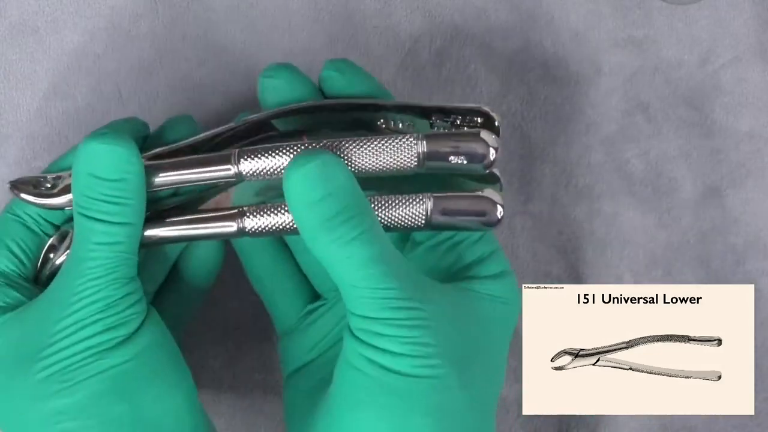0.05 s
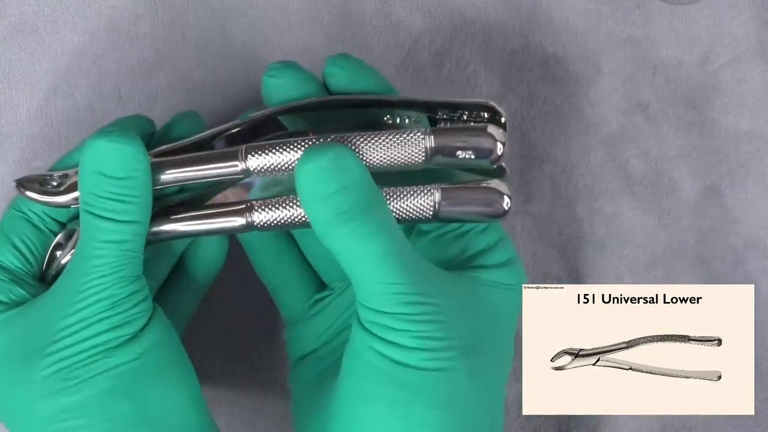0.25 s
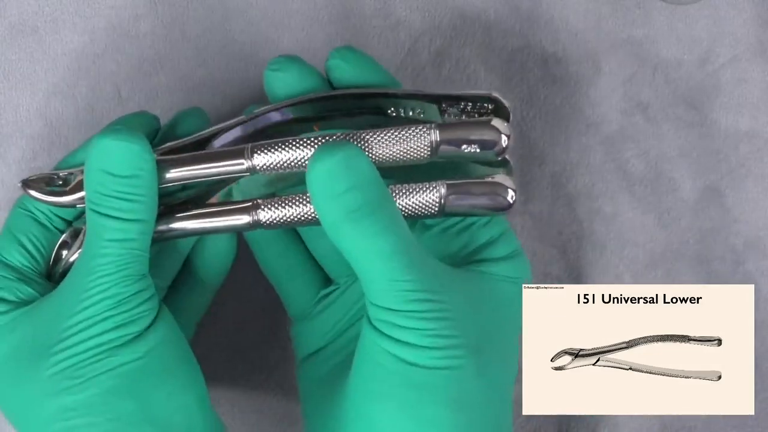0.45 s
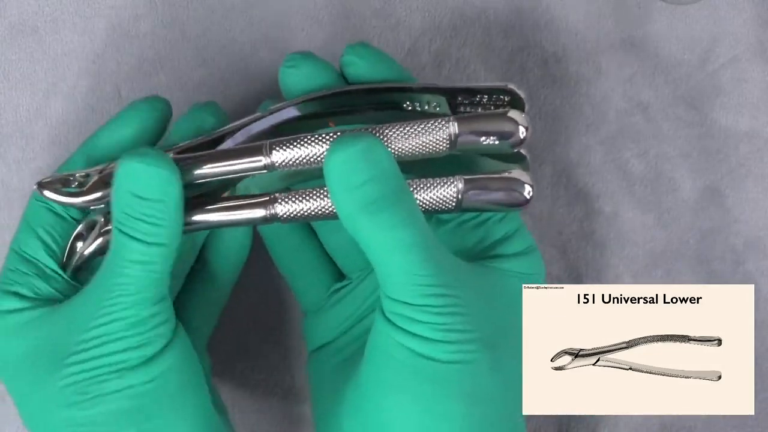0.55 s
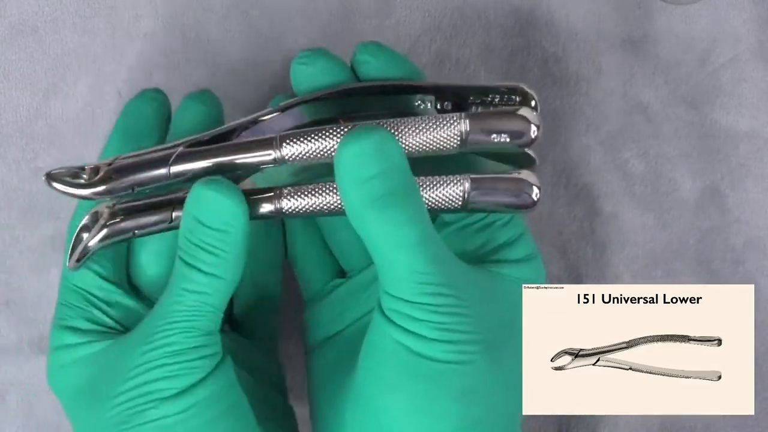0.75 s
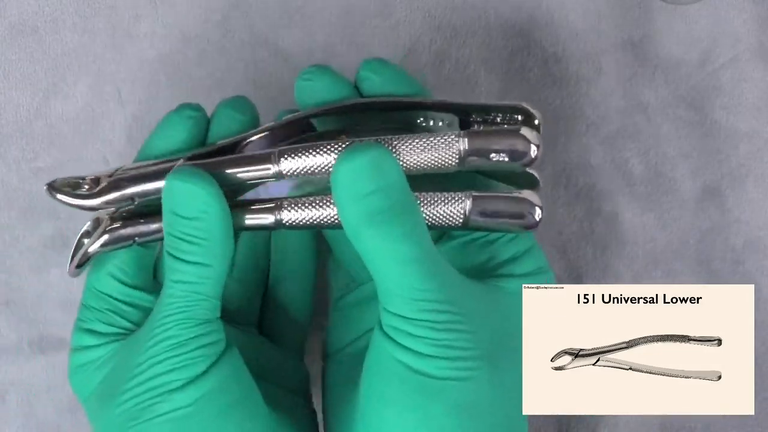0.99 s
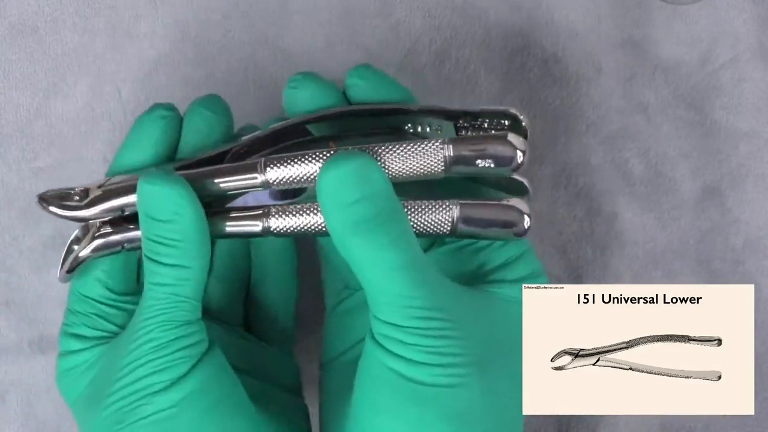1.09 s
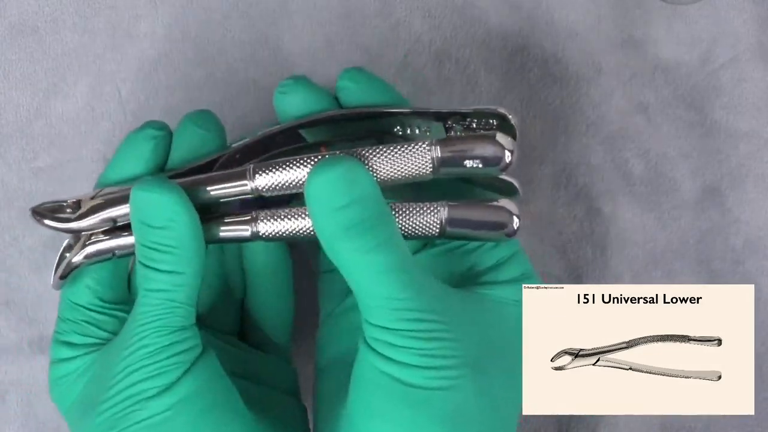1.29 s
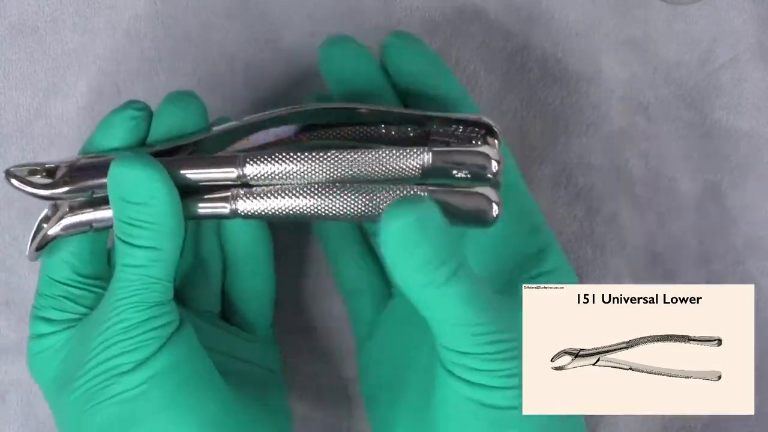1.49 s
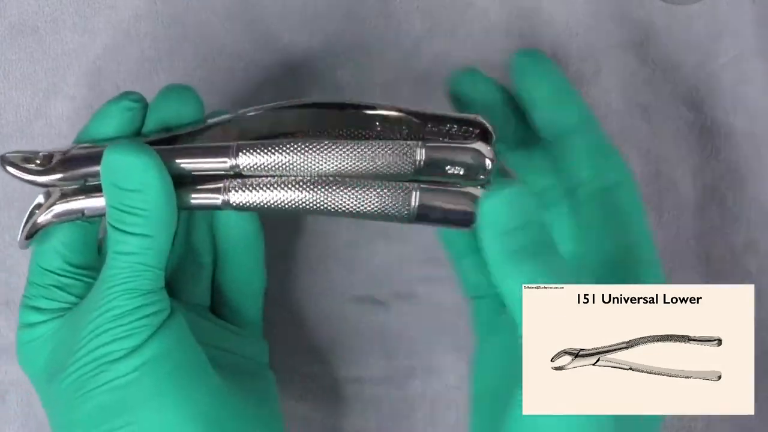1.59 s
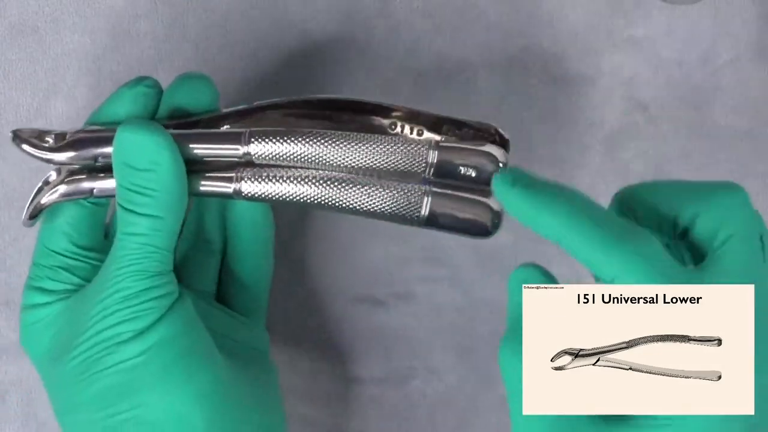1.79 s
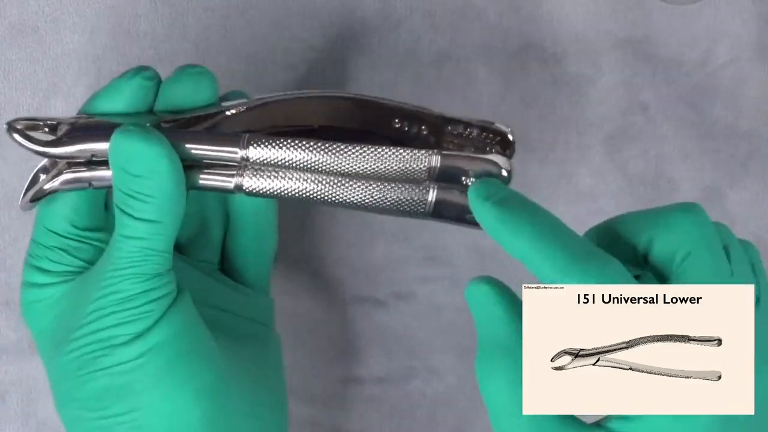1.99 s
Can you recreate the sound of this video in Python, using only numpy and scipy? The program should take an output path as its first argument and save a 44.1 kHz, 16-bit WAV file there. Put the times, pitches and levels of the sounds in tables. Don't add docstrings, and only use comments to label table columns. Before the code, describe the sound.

Metal hand tools clack together and bounce, then tick and ring softly over quiet room rumble

```python
import sys
import numpy as np
from scipy import signal
from scipy.fft import rfft, irfft
from scipy.io import wavfile

SR = 44100
rng = np.random.default_rng(int(sys.argv[2]) if len(sys.argv) > 2 else 0)


def unload_audio(sound):
    columns = np.transpose(np.atleast_2d(sound))
    steps = np.round(np.clip(columns, -1, 1) * 32767)
    wavfile.write(sys.argv[1], SR, steps.astype(np.int16))


def volts_from_db(level):
    exponent = np.asarray(level, float) / 20
    return 10 ** exponent


N = 90228
t = np.arange(N) / SR


def rms_one(x):
    return x / np.sqrt(np.mean(x ** 2) + 1e-20)


def bell(x):
    return np.exp(-0.5 * x ** 2)


def coloured(points):
    hz = np.fft.rfftfreq(2 * N, 1 / SR) + 0.1
    at, db = np.transpose(points)
    octaves_below = np.maximum(np.log2(at[0] / hz), 0)
    octaves_above = np.maximum(np.log2(hz / at[-1]), 0)
    gain = volts_from_db(np.interp(np.log(hz), np.log(at), db) - 40 * (octaves_below + octaves_above))
    return rms_one(irfft(rfft(rng.standard_normal(2 * N)) * gain)[:N])


def ring(clicks, hz, t60):
    r = volts_from_db(-60 / (t60 * SR))
    w = 2 * np.pi * hz / SR
    return signal.lfilter([0, np.sin(w)], [1, -2 * r * np.cos(w), r * r], clicks + 1e-18)


def train(times, sizes):
    out = np.zeros(N)
    out[(np.asarray(times) * SR).astype(int)] = sizes
    return out


def fade(clicks, t60):
    return signal.lfilter([1], [1, -volts_from_db(-60 / (t60 * SR))], np.abs(clicks) + 1e-18)


# (frequency [Hz], level per Hz [dB])
RUMBLE = [(4, 3.5), (12, 5), (22, -5.5), (45, -11.5), (64, -31.5), (105, -23), (170, -27.5), (300, -51.5)]
# (time [s], level [dB])
GUSTS = [(0.0, -45.5), (0.05, -49.5), (0.71, -46.5), (0.81, -33), (1.09, -46), (1.32, -40.5), (1.37, -28.5),
         (1.44, -49), (1.49, -38.5), (1.6, -53.5), (1.74, -33), (1.79, -53.5), (1.91, -41.5), (2.04, -43)]


def rumble():
    times, gust_db = np.transpose(GUSTS)
    gust_share = 0.49
    swing_db = gust_share * (np.interp(t, times, gust_db) - gust_db.mean())
    return volts_from_db(-40.5 + swing_db) * coloured(RUMBLE)


# (frequency [Hz], width [Hz], rms level [dB])
HUMS = [(79.8, 14, -53.5), (119, 15.8, -60.5), (170.2, 31, -71.5), (530.5, 87, -69.5), (4670, 200, -88.5),
        (9160, 600, -82)]


def hums():
    out = np.zeros(N)
    for hz, width_hz, db in HUMS:
        t60 = np.log(1000) / np.pi / width_hz
        tone = ring(ring(rng.standard_normal(N + SR), hz, t60), hz, t60)[SR:]
        out += volts_from_db(db) * rms_one(tone)
    return out


# (frequency [Hz], level per Hz [dB])
AIR = [(180, -2), (350, -7.5), (530, -6), (800, -12), (1200, -12), (1550, -23), (1900, -22.5),
       (2350, -35.5)]


def vent_air():
    return volts_from_db(-63.5) * coloured(AIR)


# (frequency [Hz], level per Hz [dB])
HISS = [(1410, -3), (2400, -7), (4100, -6.5), (4470, -7.5), (7460, -9), (8890, -3), (10300, -11),
        (15200, -9.5), (16200, -36)]


def hiss():
    settle_db = 6 * np.exp(-t / 0.17)
    handling_db = 5 * bell((t - 1.6) / 0.14)
    return volts_from_db(-74.5 + settle_db + handling_db) * coloured(HISS)


def background():
    calm = np.minimum((t[-1] - t) / 0.015, 1)
    return calm * (rumble() + hums()) + vent_air() + hiss()


def room(x):
    level_db, t60_s, cut_hz = -11.5, 0.17, 12000
    s = np.arange(SR // 2) / SR
    tail = rng.standard_normal(len(s)) * volts_from_db(-60 * s / t60_s) * (s > 0.003)
    tail = signal.sosfilt(signal.butter(1, cut_hz, fs=SR, output="sos"), tail)
    tail /= np.sqrt(np.sum(tail ** 2))
    return volts_from_db(level_db) * signal.fftconvolve(x, tail)[:N]


# (time [s], peak level [dB], pitch [Hz])
SNAPS = [
    (.535, -61, 6000),
    (0.782, -33, 12600),
    (1.2345, -57, 3800),
    (1.245, -40, 4580),
    (1.2445, -41.5, 9100),
    (1.259, -44, 4970),
    (1.8850, -47, 12400),
    (1.8858, -49, 7850),
]


def glove_snaps():
    out = np.zeros(N)
    for s, db, hz in SNAPS:
        onset = ring(train([s], volts_from_db(db - 10.5)), hz, 26 / hz)
        out += ring(onset, hz, 4 / hz)
    return out


# (centre time [s], rise [s], level [dB], pitch [Hz], band ratio)
PEELS = [
    (.54, 0.025, -72, 6000, 1.9),
    (0.781, 0.0087, -62, 10200, 2.4),
    (1.244, 0.0088, -58, 9400, 2.1),
    (1.249, 0.0063, -57, 4500, 1.1),
]


def glove_peels():
    grains_per_s, tail_share = 14000, 1.8
    grains = rms_one((rng.random(N) < grains_per_s / SR) * rng.standard_normal(N))
    out = np.zeros(N)
    for s, rise_s, db, hz, ratio in PEELS:
        edges_hz = [hz / max(ratio, 1.05), min(hz * ratio, 15500)]
        band = signal.butter(2, edges_hz, "band", fs=SR, output="sos")
        puff = bell((t - s) / np.where(t < s, rise_s, rise_s * tail_share))
        out += volts_from_db(db) * puff * signal.sosfilt(band, grains)
    return out


def with_side_modes(modes):
    side = []
    for hz, db, t60 in modes:
        for way in (-1, 1):
            shift = way * 0.022 * rng.uniform(0.6, 1.4)
            side.append((hz * (1 + shift), db - 1, t60 * 0.3))
    return list(modes) + side


def steel(hits, modes, level_db, chatter_db, crack_db, damping, contact_s):
    s, db, *brightness = np.transpose(hits)
    luck_db = 2.5 * rng.standard_normal((len(s), 42))
    chatter_per_s, chatter_t60_s = 1500, 0.056
    chatter = (rng.random(N) < chatter_per_s / SR) * fade(train(s, volts_from_db(db)), chatter_t60_s)
    chatter *= volts_from_db(chatter_db)
    touch = np.hanning(int(contact_s * SR) + 3)
    touch_t = np.arange(len(touch)) / SR
    out = np.zeros(N)
    for k, (hz, mode_db, t60) in enumerate(with_side_modes(modes)):
        tilt_db = brightness[0] * np.log2(hz / 5000) if brightness else 0
        blows = train(s, volts_from_db(db + tilt_db + luck_db[:, k])) + chatter * rng.standard_normal(N)
        push = touch * np.cos(2 * np.pi * hz * touch_t) * 2 / touch.sum()
        blows = np.convolve(blows, push)[:N]
        sign = (-1) ** k
        out += sign * volts_from_db(mode_db + level_db) * ring(blows, hz, t60 * damping)
    crack_t60_s, crack_band_hz = 0.011, [3350, 13000]
    band = signal.butter(3, crack_band_hz, "band", fs=SR, output="sos")
    envelope = fade(train(s, volts_from_db(db)) + chatter, crack_t60_s)
    crack = np.convolve(envelope, touch / touch.sum())[:N] * rng.standard_normal(N)
    return out + volts_from_db(crack_db + level_db) * signal.sosfilt(band, crack)


# (time [s], peak level [dB], brightness [dB per octave])
RATTLES = [(1.571, -51.5, -8), (1.578, -54, -9), (1.607, -59, -2), (1.626, -45, -2), (1.659, -57, -9),
           (1.669, -46.5, -2.5), (1.684, -54, 6), (1.7185, -45, -2), (1.733, -57, 6), (1.806, -52, -3),
           (1.817, -57, -10)]
# (frequency [Hz], level [dB], t60 [s])
DAMPED = [(3050, -8.5, 0.043), (3480, -6, 0.015), (4037, -4.5, 0.038), (5140, -3.5, 0.06), (5640, -4, .02),
          (6520, -4, 0.033), (7800, -7, 0.016), (8730, -7, 0.025), (11200, -3, 0.013), (12400, -9, .01)]


def rattles():
    return steel(RATTLES, DAMPED, level_db=-13.5, chatter_db=-11.5, crack_db=0, damping=1.05, contact_s=0.0025)


# (time [s], peak level [dB], brightness [dB per octave])
TAPS = [
    (1.9297, -47, 4),
    (1.934, -53, -10),
    (1.9571, -33, 0),
    (1.9642, -47, 5),
    (1.970, -44, -2),
    (2.0006, -38, 0),
    (2.0119, -39, 0),
    (2.0249, -40, -1),
    (2.036, -52, 0),
]
# (frequency [Hz], level [dB], t60 [s])
LIGHT = [(1124, -17.5, 0.12), (1840, -20, 0.11), (2962, -7, 0.12), (3500, -19, 0.053), (4000, -3, 0.051),
         (5200, -1, 0.06), (5240, 0, 0.073), (5496, -4, 0.033), (6130, -24, 0.023), (6400, -12, 0.033),
         (8880, -9, 0.041), (9500, -20, .035), (11400, -14, 0.013), (12500, -12, 0.023)]


def taps():
    return steel(TAPS, LIGHT, level_db=-12, chatter_db=-22, crack_db=2, damping=0.95, contact_s=0.0011)


# (time [s], peak level [dB])
CLASH = [
    (1.3829, -24),
    (1.3925, -35),
    (1.397, -36),
    (1.4017, -24),
    (1.415, -35),
    (1.4185, -34),
    (1.4250, -35),
    (1.441, -43),
    (1.465, -50),
    (1.489, -51),
]
# (frequency [Hz], level [dB], t60 [s])
HARD = [(1154, -17, 0.063), (1830, -15, 0.021), (2963, -17.5, 0.051), (3990, -7.5, 0.032),
        (5137, -4.5, 0.044), (10400, -6, .012), (6175, 0.5, 0.019), (6210, -10, 0.027), (6634, 1, 0.017),
        (6530, 3, 0.011), (7850, 0.5, 0.01), (8350, -14, 0.045), (9300, -3.5, 0.01), (12790, -6, 0.015)]


def clash():
    return steel(CLASH, HARD, level_db=-15, chatter_db=-20.5, crack_db=2, damping=1.0, contact_s=0.0009)


def scene():
    near = clash() + glove_snaps() + glove_peels() + rattles() + taps()
    return (near + room(near) + background())[None]


def low_pass(x):
    return signal.sosfilt(signal.butter(12, 16330, fs=SR, output="sos"), x)


def record(dry):
    cut = signal.sosfilt(signal.cheby2(14, 50, 16600, fs=SR, output="sos"), dry)
    return low_pass(cut)


dry = scene()
out = record(dry)
unload_audio(out)
```